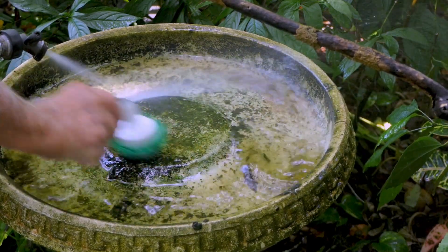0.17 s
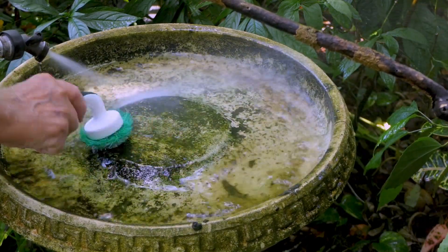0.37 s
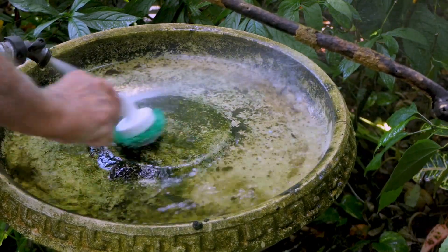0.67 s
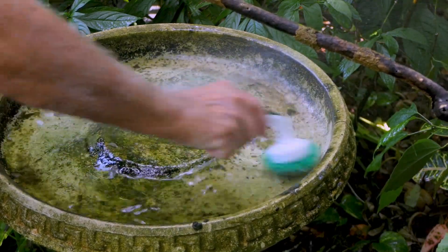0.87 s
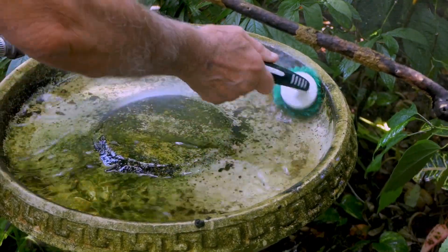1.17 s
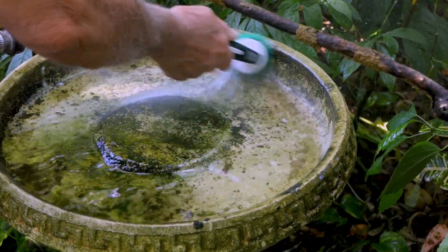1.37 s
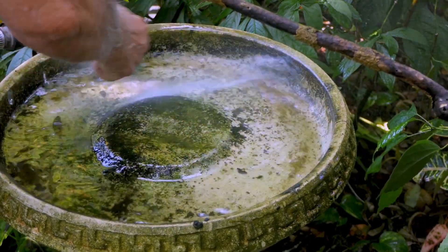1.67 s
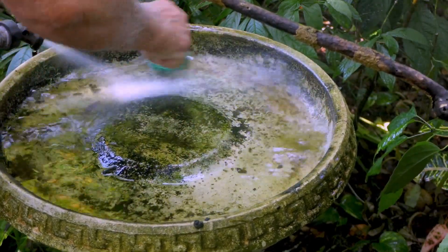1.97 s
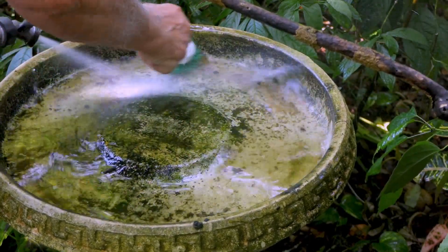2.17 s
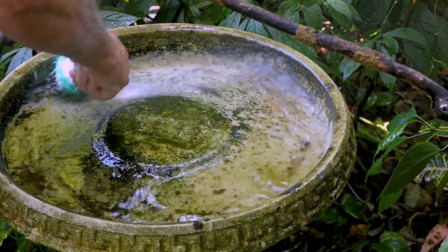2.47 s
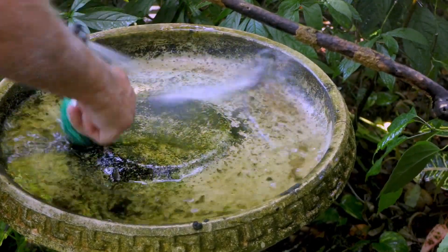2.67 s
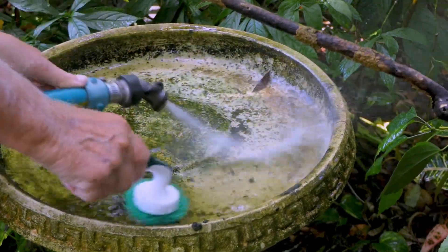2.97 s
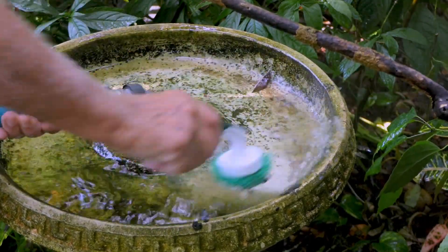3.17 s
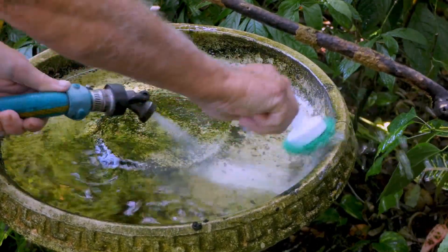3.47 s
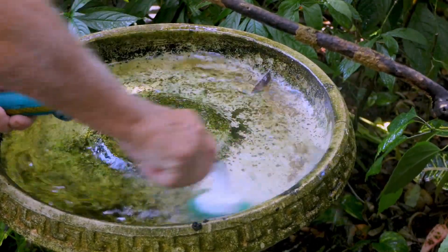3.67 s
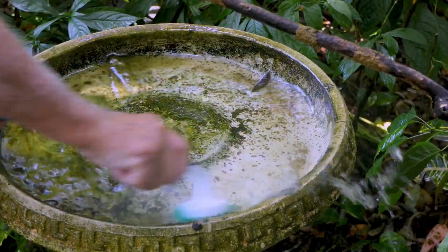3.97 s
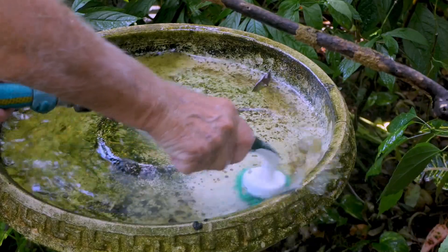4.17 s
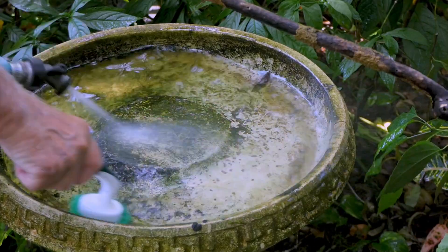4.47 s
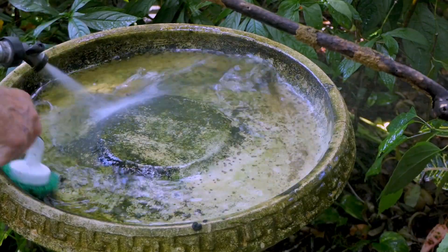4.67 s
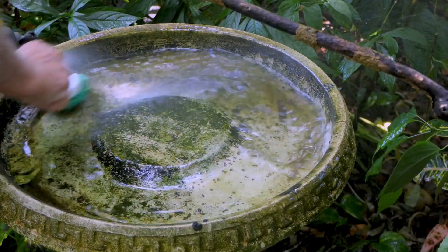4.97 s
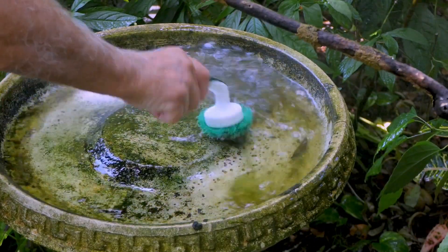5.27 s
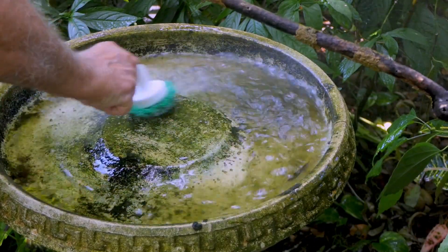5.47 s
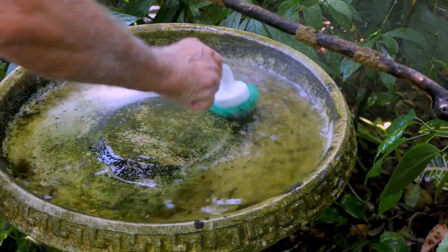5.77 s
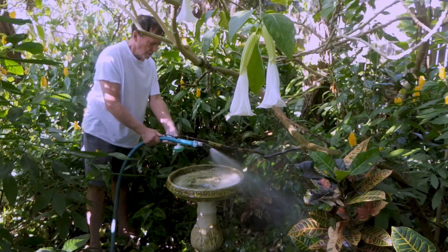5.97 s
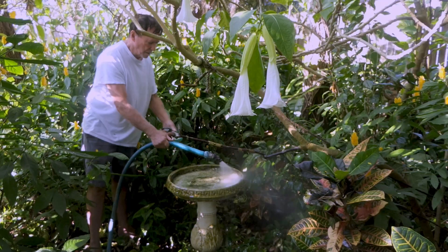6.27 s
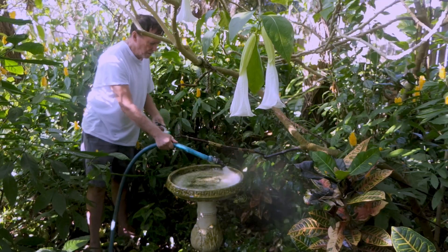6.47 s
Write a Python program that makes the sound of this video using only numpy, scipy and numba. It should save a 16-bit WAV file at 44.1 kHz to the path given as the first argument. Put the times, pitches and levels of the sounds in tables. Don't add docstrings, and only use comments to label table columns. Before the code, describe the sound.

Fizzing hose spray and drops drumming on wet concrete run throughout. Fast scratchy brush strokes with high wet squeaks open the scene, followed by a thinner wash, a crackling surge of water, small plops and a bright knock on the rim. Scrubbing and splashes return near five seconds, then an abrupt change to a more distant microphone. Faint garden rumble, centred, lightly compressed camera sound.

```python
import sys
import numpy as np
from scipy import signal
from scipy.fft import rfft, irfft, next_fast_len
from scipy.io import wavfile
from scipy.ndimage import uniform_filter1d
from numba import njit

SR = 44100
rng = np.random.default_rng(int(sys.argv[2]) if len(sys.argv) > 2 else 0)


def unload_audio(sound):
    columns = np.transpose(np.atleast_2d(sound))
    steps = np.round(np.clip(columns, -1, 1) * 32767)
    wavfile.write(sys.argv[1], SR, steps.astype(np.int16))


def ratio_of_db(decibels):
    return 10 ** (np.asarray(decibels, float) / 20)


N = 291501
WIDE = next_fast_len(N)
CUT_S = 5.874
SPARED_HZ = 14950


def level(x, db):
    return x * ratio_of_db(db) / np.sqrt(np.mean(x ** 2))


def band(x, hz, width):
    return signal.lfilter(*signal.iirpeak(hz, hz / width, fs=SR), x)


def resonances(source, table):
    return [level(band(source(), hz, width), db) for hz, width, db in table]


def noise():
    return rng.standard_normal(N)


def walk(rate):
    k = int(SR / rate)
    held = np.repeat(rng.standard_normal(N // k + 1), k)
    return 1.14 * uniform_filter1d(uniform_filter1d(held, k), k)[:N]


@njit
def ring(n, start, hz, cycles, size, glide, soft):
    out = np.zeros(n)
    for k in range(len(start)):
        length = int(cycles[k] * SR / hz[k]) + 2
        step, a, lag = 2 * np.pi * hz[k] / SR, size[k], 1.
        fade, rise = np.exp(-5. / length), np.exp(-1. / (soft * length))
        i0 = int(start[k])
        phase = step * (1 - (start[k] - i0))
        for i in range(i0 + 1, min(i0 + 1 + length, n)):
            lag *= rise
            out[i] += a * (1 - lag) * np.sin(phase)
            phase += step
            step *= 1 + glide / length
            a *= fade
    return out


def grains(hz, octaves, cycles, per_s, spread_db, glide, trim_db, flicker_db=-0.5, bend=None):
    u = rng.random((200000, 4))[:int(per_s * N / SR)].T
    bell = np.sqrt(-2 * np.log(1 - u[1])) * np.cos(2 * np.pi * u[2])
    centre = hz if bend is None else bend[(u[0] * N).astype(int)]
    pitch = np.minimum(centre * 2 ** (octaves * bell), .4 * SR)
    size = ratio_of_db(spread_db * np.minimum(-np.log(1 - u[3]), 4))
    size = size * np.sign(np.sin(2 * np.pi * u[2]))
    shower = ring(N, u[0] * N, pitch, cycles + 0 * pitch, size, 1. * glide, 0.04)
    edges = [hz / 1.75, min(hz * 1.42, .45 * SR)]
    shower = signal.sosfilt(signal.butter(2, edges, "band", fs=SR, output="sos"), shower)
    return level(shower, trim_db) * ratio_of_db(flicker_db * walk(25))


def lone_rings(table, glide, trim_db):
    s, db, hz, cycles = np.array(table, float).T
    return ring(N, s * SR, hz, np.maximum(cycles, 1), ratio_of_db(db + trim_db), 1. * glide, 0.063)


def swell_power(s, length, db, weight=1):
    t = np.arange(0, N + 64, 64) / SR
    distance = np.abs(2 * (t - s[:, None]) / np.maximum(length, .01)[:, None])
    bells = ratio_of_db(db)[:, None] ** 2 * 2. ** -distance ** 2.6
    return np.interp(np.arange(N) / SR, t, (bells.T * weight).sum(axis=1))


def over(table, rest_db, rest_hz):
    s, length, db, hz = np.transpose(table)
    events, rest = swell_power(s, length, db), ratio_of_db(rest_db) ** 2
    pitch = (rest * rest_hz + swell_power(s, length, db, hz)) / (rest + events)
    return np.sqrt(rest + events), pitch


def aim():
    # (time [s], force [dB], drumming minus mist [dB])
    hose_spans = [
        [(0.0, -37, -4.5), (.85, -38, -3), (1.25, -39.5, -2.5), (1.66, -37.5, -3), (1.76, -33, -6),
         (2.45, -32.5, -3.5), (2.8, -37.5, -3), (3.1, -39.5, 0), (3.4, -36, -2), (3.8, -38, -0.5),
         (4.36, -42, 0), (4.62, -38, -4), (5.27, -35.5, -3), (5.4, -40.5, -4.5), (5.87, -40.5, -0.5)],
        [(5.878, -36, 2), (6.4, -36.5, 1.5), (6.61, -36, 1)],
    ]
    s, *columns = np.concatenate(hose_spans).T
    return [np.interp(np.arange(N) / SR, s, c) for c in columns]


def follow(usual_db, by_force, by_steep, far_db):
    force_db, steep_db = aim()
    far = np.arange(N) >= CUT_S * SR
    return usual_db + by_force * (force_db + 36) + by_steep * steep_db + far_db * far


def spatter(per_s, length, boost_db):
    u = rng.random((2, N))
    slugs = (u[0] < per_s / SR) * (0.43 + u[1])
    decay = np.exp(-1 / (length * SR))
    return boost_db * np.minimum(signal.lfilter([1], [1, -decay], slugs), 1.3)


def jet():
    # (time [s], length [s], mist [dB], drumming [dB])
    splashes = [(0.13, 0.076, -38, -43), (0.266, 0.028, -37, -33), (0.377, 0.045, -40, -34.5),
                (0.55, 0.04, -31, -33.5), (0.675, 0.054, -40, -38), (0.783, 0.069, -40, -40),
                (1.754, 0.039, -38, -38), (2.067, 0.11, -35, -36), (2.272, 0.045, -44, -40),
                (2.653, 0.05, -38, -53), (3.46, 0.11, -38, -38), (3.627, 0.03, -41, -41),
                (3.877, 0.093, -36, -39), (4.056, 0.08, -36, -35), (4.23, 0.13, -41, -42.5),
                (4.448, 0.042, -51, -44), (4.76, 0.17, -34.5, -37.5), (5.043, 0.044, -40, -35.5),
                (5.11, 0.03, -35, -35.5), (5.225, 0.059, -35, -36.5), (5.49, 0.18, -48, -43.5),
                (5.697, 0.048, -41, -41), (5.795, 0.066, -40, -41.5), (5.93, 0.073, -41, -39),
                (6.237, 0.08, -42, -41), (6.562, .05, -39, -36.5)]
    force_db, steep_db = aim()
    s, length, mist_db, drum_db = np.transpose(splashes)
    mist = np.sqrt(ratio_of_db(force_db) ** 2 + swell_power(s, length, mist_db))
    stone = np.sqrt(ratio_of_db(force_db + steep_db) ** 2 + swell_power(s, length, drum_db))
    stone_hz = 6287 - 65.5 * 20 * np.log10(stone / mist)
    nozzle = ratio_of_db(follow(usual_db=-46, by_force=0.6, by_steep=-0.04, far_db=-7.5))
    nozzle = nozzle * (mist / ratio_of_db(force_db)) ** .18
    blast = np.clip((20 * np.log10(nozzle) + 51) / 9, .15, 1)
    stream_db = 0.76 * walk(60) + blast * spatter(per_s=140, length=0.0016, boost_db=3.2)
    fine = grains(hz=9830, octaves=0.19, cycles=6.0, per_s=25000, spread_db=2.3, glide=0.022, trim_db=0.15,
                  flicker_db=0.6)
    drumming = grains(hz=6107, octaves=0.24, cycles=7.5, per_s=15000, spread_db=3.0, glide=0.04, trim_db=0.04,
                      flicker_db=1.05, bend=stone_hz)
    hiss = grains(hz=14000, octaves=0.18, cycles=4.0, per_s=22000, spread_db=1.6, glide=0.015, trim_db=2.8,
                  flicker_db=1.0)
    spray = mist * fine + stone * drumming
    return ratio_of_db(stream_db) * spray + nozzle * ratio_of_db(0.55 * stream_db) * hiss


def brush():
    # (time [s], length [s], rasp [dB], rasp pitch [Hz])
    strokes = [(0.103, 0.062, -39.5, 3620), (0.283, 0.051, -37, 4500), (0.389, 0.052, -37, 3640),
               (0.552, 0.059, -38.5, 3270), (0.684, 0.072, -36, 3600), (0.796, 0.08, -43.5, 3680),
               (0.877, 0.058, -43, 3370), (0.984, 0.022, -48, 4270), (1.065, 0.037, -48, 4200),
               (1.74, 0.13, -44.5, 3840), (2.368, .04, -44.5, 4130), (2.578, 0.12, -52.5, 3820),
               (3.042, 0.088, -49, 4100), (3.201, 0.054, -42, 3760), (3.615, 0.03, -45, 4020),
               (3.725, 0.051, -45, 4100), (3.856, 0.13, -44, 4320), (4.073, 0.1, -43, 4280),
               (4.292, 0.058, -44, 3180), (5.051, 0.03, -45, 4200), (5.103, 0.035, -41.5, 4240),
               (5.2, 0.1, -48.5, 3870), (5.392, 0.041, -48.5, 3130), (5.5, 0.08, -45.5, 3400),
               (5.753, 0.1, -41.5, 3430), (5.922, 0.068, -41, 3970), (6.173, 0.15, -40, 4120),
               (6.36, 0.091, -42.5, 4260), (6.549, 0.065, -38, 3800)]
    # (time [s], length [s], level [dB], bubble pitch [Hz])
    sloshes = [(.115, 0.053, -48.5, 1700), (0.385, 0.05, -48, 1650), (.56, 0.07, -50, 2200),
               (.67, 0.075, -47, 1850), (1.425, 0.17, -47, 1760), (1.72, 0.092, -47.5, 1950),
               (1.98, 0.13, -43.5, 2240), (3.17, 0.075, -54.5, 1610), (3.59, 0.11, -50, 1414),
               (4.067, 0.094, -49.5, 1735), (5.052, 0.025, -38.5, 1750), (5.22, 0.092, -49.5, 1590),
               (5.39, 0.09, -49, 2330), (5.49, 0.14, -46, 1810), (5.701, 0.07, -41.5, 1960),
               (5.92, 0.22, -46.5, 1850), (6.21, 0.079, -46.5, 2020)]
    # (centre [Hz], width [Hz], level [dB])
    head_modes = [(1680, 220, -18.5), (3460, 330, -10.5), (4850, 350, -7)]
    scatter_db = follow(usual_db=-45, by_force=0.33, by_steep=0.02, far_db=5.5)
    film_db = follow(usual_db=-53.5, by_force=0.27, by_steep=-0.12, far_db=7)
    rasp, rasp_hz = over(strokes, scatter_db, 3953)
    churn, churn_hz = over(sloshes, film_db, 1807)
    drag = ratio_of_db(1.2 * walk(75))
    bristles = grains(hz=3500, octaves=0.35, cycles=17.5, per_s=5001, spread_db=1, glide=0.08, trim_db=-2.5,
                      bend=rasp_hz)
    bubbles = grains(hz=1807, octaves=0.24, cycles=19.5, per_s=1794.5, spread_db=1.5, glide=1.17, trim_db=-3.5,
                     bend=churn_hz)
    tufts = grains(hz=3472, octaves=-0.34, cycles=48, per_s=402, spread_db=3, glide=0.65, trim_db=-7, bend=rasp_hz)
    moving = np.sqrt(swell_power(*np.transpose(strokes)[:3]))
    flicks = noise() * ratio_of_db(3.7 * walk(150))
    head = sum(level(band(band(flicks, hz, width), hz, width), db) for hz, width, db in head_modes)
    return drag * (rasp * bristles + churn * bubbles + moving * (tufts + head))


def glitter():
    pings = grains(hz=7400.5, octaves=0.39, cycles=116, per_s=697, spread_db=4, glide=0, trim_db=0)
    pings_db = follow(usual_db=-45, by_force=1.24, by_steep=0.7, far_db=0.5)
    beads = grains(hz=2599.5, octaves=0.4, cycles=63.5, per_s=329.5, spread_db=2.5, glide=0.06, trim_db=-1)
    beads_db = follow(usual_db=-56.5, by_force=0.7, by_steep=0, far_db=1.5)
    return ratio_of_db(pings_db) * pings + ratio_of_db(beads_db) * beads


def garden():
    # (frequency [Hz], level [dB per Hz])
    rumble_shape = [(15, -42), (25, -9.5), (98, 0), (182, -3), (344, 0), (415, -5), (605, -5), (913, -2),
                    (1050, -4), (1500, 0), (1950, -43.5), (3300, -120)]
    # (centre [Hz], width [Hz], level [dB rms])
    machines = [(123.6, 2.5, -74), (347.5, 37, -75), (510.8, 10, -72), (892, 18, -79), (1674, 45, -64.5)]
    # (time [s], length [s], level [dB])
    breeze = [(0.097, 0.65, -72), (0.957, 0.28, -66.5), (1.2, 0.23, -72), (1.62, 0.25, -63.5),
              (2.02, 0.18, -68.5), (2.402, 0.11, -66), (2.72, 0.36, -63.5), (3.0, .25, -73),
              (3.697, 0.46, -64), (4.2, .3, -68), (4.48, 0.21, -64.5), (5.016, 0.21, -66.5),
              (5.3, 0.27, -70), (5.82, 0.12, -68)]
    # (centre [Hz], width [Hz], level [dB rms])
    hollows = [(750, 90, -67.5), (1110, 150, -63.5), (393, 65, -70.5)]
    near = np.arange(N) < CUT_S * SR
    hz, db = np.transpose(rumble_shape)
    bins = np.arange(WIDE // 2 + 1) * SR / WIDE
    shape = ratio_of_db(np.interp(np.log(bins + 1), np.log(hz), db))
    rumble = irfft(shape * rfft(rng.standard_normal(WIDE)), WIDE)[:N]
    rumble = level(rumble, -56.5) * ratio_of_db(0.43 * walk(16) + 0.99 * walk(7))
    hum = sum(tone * ratio_of_db(2.0 * walk(7)) for tone in resonances(noise, machines))
    swell = np.sqrt(ratio_of_db(-81.5) ** 2 + swell_power(*np.transpose(breeze)))
    phase = 2 * np.pi * np.cumsum(95.2 + 6.5 * walk(20)) / SR
    drone = swell * ratio_of_db(2.8 * walk(25)) * np.sqrt(2) * np.sin(phase)
    bowl = sum(tone * ratio_of_db(3.6 * walk(12)) for tone in resonances(noise, hollows))
    splash = grains(hz=1153, octaves=.5, cycles=3.5, per_s=2999, spread_db=4, glide=1.5, trim_db=-57.5)
    return rumble + np.where(near, hum + drone, splash + bowl)


def droplets():
    # (time [s], peak [dB], pitch [Hz], length [cycles])
    landings = [(0.064, -38, 4400, 96), (0.107, -37, 4770, 96), (0.132, -37, 3090, 59),
                (0.241, -37, 3500, 77), (0.262, -28, 4850, 95), (0.368, -34, 2430, 55),
                (0.398, -30, 3110, 68), (0.536, -29, 4800, 93), (0.543, -35, 2100, 46),
                (0.554, -31, 4850, 106), (0.633, -38, 1960, 37), (0.649, -43, 1710, 37),
                (0.649, -34, 2640, 57), (0.711, -36, 3170, 69), (0.86, -40, 2570, 55),
                (0.874, -47, 1650, 36), (1.35, -41, 2870, 140), (1.389, -41, 2090, 47),
                (1.451, -46, 1580, 45), (1.54, -36, 4740, 120), (1.425, -43, 2200, 45),
                (1.749, -40, 2540, 55), (1.925, -42, 2250, 60), (1.942, -37, 2400, 60),
                (2.0, -32.5, 2900, 51), (2.253, -42, 1670, 36), (2.42, -41, 2140, 47),
                (2.506, -37, 4380, 96), (2.76, -47, 1640, 36), (3.114, -41, 1710, 39),
                (3.146, -43, 2760, 60), (3.196, -34, 3160, 70), (3.214, -39, 2590, 48),
                (3.445, -43, 1440, 31), (3.611, -35, 3220, 70), (3.613, -36, 4460, 97),
                (3.729, -39, 3190, 71), (4.073, -36, 2920, 70), (4.096, -47, 2290, 50),
                (4.122, -43, 1420, 80), (1.975, -37, 2560, 70), (4.695, -45, 3140, 69),
                (4.745, -33.5, 3900, 94), (5.051, -38, 2970, 64), (5.055, -35, 4140, 90),
                (5.085, -29, 3930, 87), (5.162, -42, 2400, 52), (5.178, -34, 4570, 100),
                (5.189, -35, 2900, 55), (5.209, -35, 2880, 63)]
    return lone_rings(landings, glide=0.027, trim_db=4.2)


def squeaks():
    # (time [s], peak [dB], pitch [Hz], length [cycles])
    slips = [(0.098, -29, 3520, 60), (0.372, -24, 3480, 60), (0.385, -22, 3500, 70), (0.402, -27, 3480, 68),
             (0.378, -27, 4950, 90), (0.648, -22, 3430, 70), (5.742, -36, 2340, 50), (5.745, -41, 2530, 70),
             (5.742, -34, 3430, 90), (5.762, -29, 3580, 73), (0.5494, -31.5, 3150, 44),
             (0.6634, -22, 3460, 75), (0.6973, -23, 3520, 81), (0.7694, -28, 3740, 68),
             (0.7926, -24, 3490, 65), (0.8579, -27, 3150, 50), (1.9594, -39, 2430, 71),
             (3.2006, -39, 3720, 50), (3.8222, -33, 2480, 39), (3.915, -38, 3650, 80),
             (5.0484, -33, 2210, 50), (5.1622, -30, 3790, 43), (5.349, -34, 2320, 50),
             (5.358, -30, 2280, 50), (5.3807, -30, 2590, 50), (5.407, -36, 2620, 60),
             (5.479, -34, 3200, 60), (5.435, -38, 2720, 70), (5.70, -36, 2880, 60), (5.715, -36, 2780, 60),
             (0.82, -28, 3500, 56), (5.4705, -30, 3730, 50), (5.5494, -35, 2570, 76),
             (5.676, -33, 2210, 50), (5.8117, -33, 3730, 50), (5.69, -34, 4960, 97),
             (5.738, -34, 4700, 110), (5.912, -37, 2160, 50), (5.931, -37, 2020, 50), (6.18, -43, 2060, 77),
             (6.2, -30, 2010, 73), (6.37, -29, 4760, 90), (6.556, -27, 4960, 90), (5.835, -31, 3050, 67),
             (6.46, -41, 1890, 60), (6.35, -41, 1930, 60)]
    return lone_rings(slips, glide=0.042, trim_db=0.32)


def plops():
    # (time [s], peak [dB], pitch [Hz], length [cycles])
    bubble_events = [(0.1194, -38, 1690, 31), (0.391, -32, 1730, 32), (1.351, -34.5, 1670, 50),
                     (1.389, -33, 1680, 26), (1.441, -41, 1680, 30), (1.464, -37, 1520, 32),
                     (1.4316, -38, 1660, 33), (3.2, -40, 1446, 28), (3.483, -42, 1740, 45),
                     (3.528, -32, 1430, 27), (3.558, -40, 1480, 26), (3.573, -37, 1480, 20),
                     (3.626, -37, 1640, 24), (3.544, -34, 1380, 19), (3.565, -44, 1440, 35),
                     (3.597, -45, 1450, 29), (3.584, -39, 1410, 32), (3.6135, -25.5, 1580, 18),
                     (3.6365, -33, 1430, 34), (3.642, -35, 1640, 26), (4.0447, -43, 1670, 36),
                     (4.02, -40, 1680, 60), (4.15, -39, 1620, 45), (4.17, -40, 1680, 30),
                     (5.0559, -35, 1890, 33), (5.1926, -40, 1740, 30), (5.2235, -33.5, 1410, 45),
                     (5.6166, -40, 1550, 34), (5.6994, -35, 1880, 34), (5.745, -35, 1580, 50),
                     (5.8499, -37, 1614, 25), (6.518, -44, 1270, 34)]
    return lone_rings(bubble_events, glide=0.036, trim_db=0.49)


def smacks():
    # (time [s], peak [dB], pitch [Hz], length [cycles])
    heavy_slugs = [(0.2579, -21, 6460, 12), (0.5289, -16, 10160, 10), (0.5344, -23, 10850, 8),
                   (0.5421, -19, 6600, 10), (0.5644, -19, 10800, 8), (0.572, -18, 4740, 8.5),
                   (1.8299, -11, 9300, 7.5), (1.8769, -22, 10290, 8), (1.9422, -22, 9220, 8.9),
                   (1.994, -13, 8870, 7.1), (2.0177, -17, 9690, 8), (2.0241, -16, 6930, 8),
                   (2.0325, -15, 9600, 8), (2.0401, -18, 11240, 8), (2.0488, -11, 9220, 7.2),
                   (2.0676, -14, 6330, 8), (2.0739, -17, 6330, 8), (2.0858, -24, 9690, 8),
                   (2.1139, -20, 9860, 8), (2.1397, -17, 9780, 8), (2.1526, -15, 8700, 11),
                   (2.2227, -15, 9860, 9.5), (2.2748, -8, 10290, 13), (2.2829, -17, 11240, 8.7),
                   (2.4371, -16, 11150, 8), (2.4873, -12, 8740, 8.8), (3.4743, -14, 6630, 10),
                   (4.036, -16.5, 6700, 7.3), (4.7459, -16, 10120, 8), (4.7988, -18, 9430, 8),
                   (4.8049, -14, 5560, 9.4), (4.8148, -17, 11070, 9.8), (4.8196, -14, 11500, 8),
                   (5.0306, -11, 11200, 6.2), (5.0488, -15, 6950, 10), (5.0923, -19, 9300, 7.3),
                   (5.0962, -17, 7450, 6.7), (5.1091, -12, 9950, 9.4), (5.1145, -16, 6370, 7.1),
                   (5.2486, -16, 9090, 7.3), (5.8764, -14, 6420, 8), (6.2616, -20, 8740, 8.7),
                   (6.5559, -22, 6760, 9.3)]
    return lone_rings(heavy_slugs, glide=0.086, trim_db=3.0)


def knocks():
    # (time [s], peak [dB], pitch [Hz], length [cycles])
    bumps = [
        (0.329, -53, 330, 27),
        (0.751, -51.5, 264, 17),
        (1.28, -51, 204, 8.3),
        (1.285, -47, 272, 10.4),
        (2.549, -54, 260, 14),
        (3.613, -41.5, 900, 13),
        (3.612, -36, 2280, 24),
        (3.897, -53, 285, 14),
        (4.201, -46, 850, 25),
        (6.549, -41, 1120, 22),
    ]
    return lone_rings(bumps, glide=0.012, trim_db=7.0)


def tick():
    time_s, width_s, peak_db = 3.617, 0.0024, -30
    swell = np.exp(-((np.arange(N) / SR - time_s) / width_s) ** 2)
    return ratio_of_db(peak_db) * swell * level(band(noise(), 4600, 1900), 0)


def scene():
    water = jet() + glitter() + droplets() + plops() + smacks()
    scrubbing = brush() + squeaks() + knocks() + tick()
    mono = water + scrubbing + garden()
    return np.array([mono, mono])


def cosines(window, k):
    hop = len(window) // 2
    angle = np.pi / hop * np.outer(k + .5, np.arange(2 * hop) + .5 + hop / 2)
    return np.sqrt(2 / hop) * window * np.cos(angle)


def starve(x):
    starved_s = [.038, .337, .550, .742, 1.552, 1.659, 2.960, 3.217, 3.259, 3.728, 4.005, 4.133, 4.433,
                 4.902, 5.755, 5.777, 5.862]
    starved_db = [21.1, 21.5, 21.25, 21.5, 21.6, 21.5, 21.2, 21.5, 21.66, 21.7, 21.4, 21.2, 21.8, 21.5,
                  21.1, 20.8, 22.3]
    hop, usual_db, uneven_db = 941, -10.5, 2.0
    lead, frames = 2 * hop - 735, N // hop + 3
    hops = np.pad(x, (lead, (frames + 1) * hop - lead - N)).reshape(-1, hop)
    window = np.sin(np.pi * (np.arange(2 * hop) + .5) / (2 * hop))
    basis = cosines(window, np.arange(hop))
    lines = np.hstack([hops[:-1], hops[1:]]) @ basis.T
    local = uniform_filter1d(lines ** 2, size=31, axis=1) + 1e-14
    scatter = np.repeat(rng.standard_normal((frames, 59)), 16, axis=1)[:, :hop]
    step_db = usual_db + uneven_db * scatter
    share = np.full((frames, 1), .47)
    short = np.round((np.array(starved_s) * SR + lead) / hop).astype(int) - 1
    step_db[short] = usual_db + np.array(starved_db)[:, None] + 0.44 * (step_db[short] - usual_db)
    share[short] = 0.33
    masked = np.sqrt(local ** share * local.mean(axis=1, keepdims=True) ** (1 - share))
    spared = np.clip(np.arange(hop) * SR / (2 * hop) / 120, .1, 1) ** 2
    spared[int(SPARED_HZ * 2 * hop / SR):] = .01
    step = ratio_of_db(step_db) * masked * spared
    rounded = np.sign(lines) * step * np.floor(np.abs(lines) / step + .42)
    back = rounded @ basis
    hops = np.pad(back[:, :hop], ((0, 1), (0, 0))) + np.pad(back[:, hop:], ((1, 0), (0, 0)))
    return hops.ravel()[lead:lead + N]


def fill(x):
    # (time [s], low edge [Hz], high edge [Hz])
    filled = [(.95, 10300, 11900), (.95, 12400, 13900), (.95, 14500, 15700), (1.578, 8900, 12500),
              (3.345, 7600, 9100), (4.413, 7600, 9100), (5.62, 4200, 6400), (5.62, 14500, 15700),
              (5.76, 8900, 10500), (5.992, 4200, 5300), (5.992, 5700, 7000), (5.992, 12400, 15200),
              (6.387, 14500, 15700), (6.457, 11700, 13900), (6.61, 5000, 7000), (6.61, 10300, 11900),
              (6.61, 13000, 14500)]
    frame, grid = 1024, 788
    side, x = np.zeros(N + 3 * frame), np.pad(x, (0, 3 * frame), "reflect")
    window = signal.windows.kaiser_bessel_derived(2 * frame, 4 * np.pi)
    for s, lo, hi in filled:
        start = grid + frame * (round((s * SR - grid) / frame) - 1)
        span = slice(start, start + 2 * frame)
        basis = cosines(window, np.arange(int(lo * 2 * frame / SR), int(hi * 2 * frame / SR)))
        strength = np.sqrt(np.mean((basis @ x[span]) ** 2))
        side[span] += strength * rng.standard_normal(len(basis)) @ basis
    return ratio_of_db(-3) * side[:N]


def low_pass(x):
    return signal.sosfilt(signal.butter(12, 16950, fs=SR, output="sos"), x)


def record(dry):
    # (centre [Hz], width [Hz], added share [0-1])
    ringing_bands = [(4370, 270, 0.2), (6510, 510, 0.19), (9620, 310, 0.15), (8740, 340, 0.22),
                     (11440, 410, 0.23)]
    top_hz = 15750
    dipped = dry[0] - 0.35 * band(dry[0], 7930, 650)
    mic = signal.sosfilt(signal.butter(2, 36, "high", fs=SR, output="sos"), dipped)
    mic = mic + sum(share * band(mic, hz, width) for hz, width, share in ringing_bands)
    top_band = signal.ellip(6, .5, 50, [SPARED_HZ, top_hz], "band", fs=SR, output="sos")
    hiss = level(signal.sosfilt(top_band, noise()), -62)
    below_top = np.arange(WIDE // 2 + 1) * SR / WIDE < top_hz
    mid = irfft(rfft(starve(mic) + hiss, WIDE) * below_top, WIDE)[:N]
    side = fill(mid)
    return low_pass(np.array([mid + side, mid - side]))


dry = scene()
out = record(dry)
unload_audio(out)
```